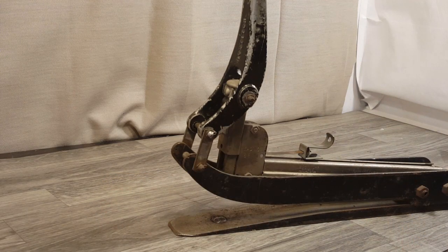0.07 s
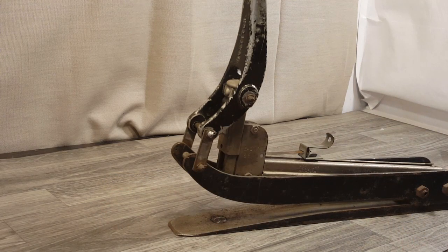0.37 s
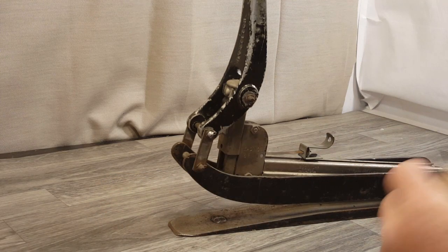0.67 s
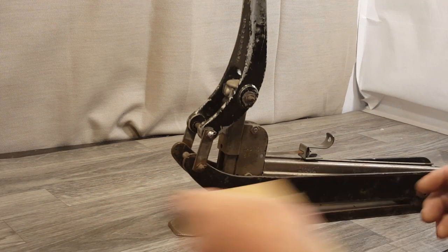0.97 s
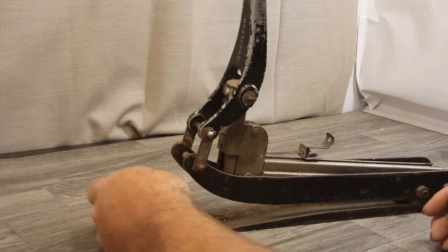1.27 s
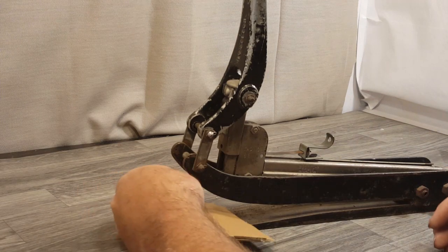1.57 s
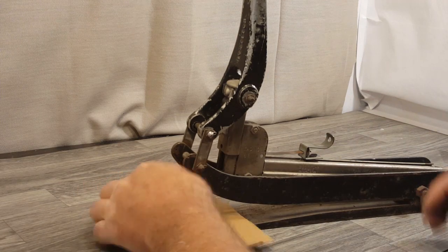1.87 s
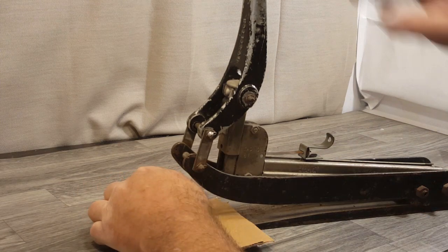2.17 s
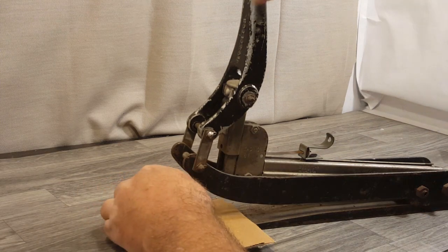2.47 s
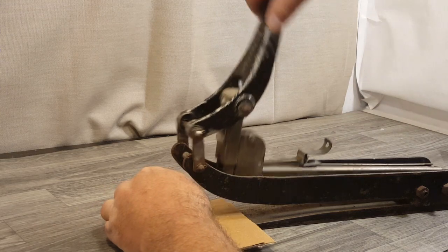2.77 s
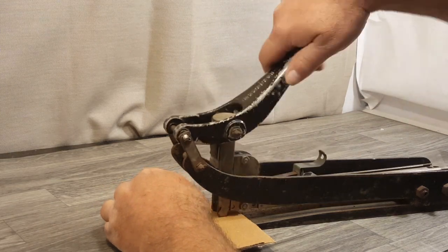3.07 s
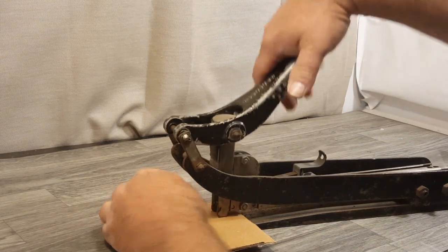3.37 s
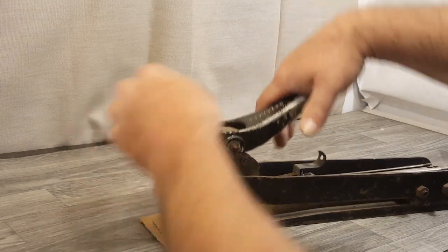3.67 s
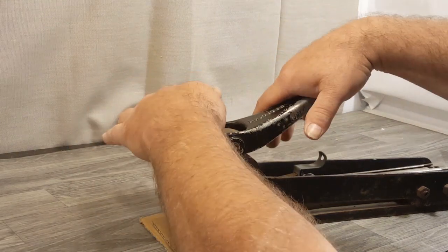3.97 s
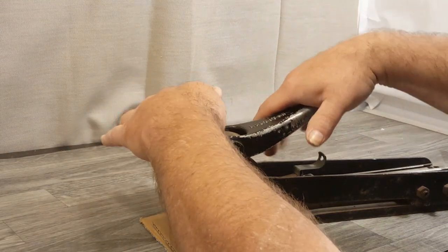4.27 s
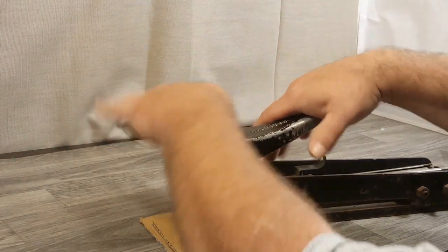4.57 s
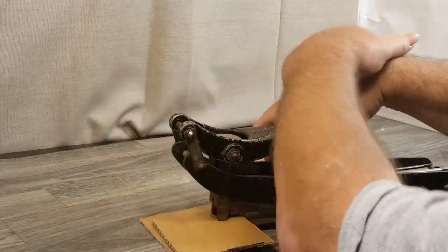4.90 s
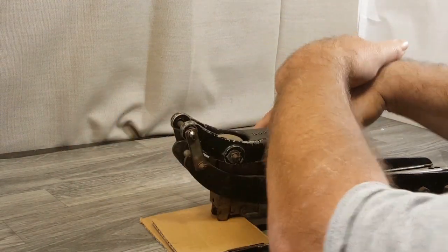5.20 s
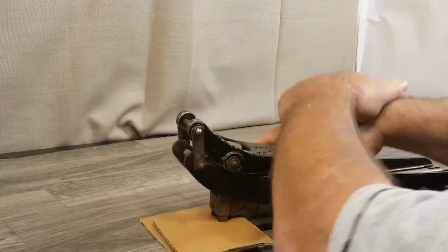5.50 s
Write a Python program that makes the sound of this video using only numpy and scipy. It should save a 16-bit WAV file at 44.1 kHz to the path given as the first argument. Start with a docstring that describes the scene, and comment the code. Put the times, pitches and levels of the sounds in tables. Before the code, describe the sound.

In a small room, a piece of cardboard is pushed along the floor in several soft, scratchy strokes. The metal linkage of a big carton stapler clacks and knocks as its lever comes down. A bright snap and a harder punch follow, then the loudest moment, a double steel clack that shakes the floor. The nearby microphone adds a faint hiss and thin whine.

```python
"""First comes the dry rasp of cardboard, slid over a laminate floor and under a heavy lever carton stapler.
The lever is pulled down: its linkage clicks, the staple snaps off the strip, the driver punches the card,
and a last shove clinches it with a double clack that shakes the floor. Sliding friction makes broadband
noise; each impact excites damped modes of steel, frame and floor, and the small room reverberates.
Beneath it all lie quiet room air and a faint microphone hiss and whine."""
import sys
import numpy as np
from scipy import signal
from scipy.fft import rfft, irfft, next_fast_len
from scipy.io import wavfile
from scipy.ndimage import map_coordinates

SR = 44100
rng = np.random.default_rng(int(sys.argv[2]) if len(sys.argv) > 2 else 0)


def wav_record(signal):
    """Record a signal, one row per channel, as 16-bit PCM in the file named by sys.argv[1]."""
    frames = np.transpose(np.atleast_2d(signal))
    bounded = np.clip(frames, -1, 1)
    # unit amplitude maps onto the largest positive 16-bit level
    quanta = np.round(bounded * 32767).astype(np.int16)
    wavfile.write(sys.argv[1], SR, quanta)


N = 248724
TIME = np.arange(N) / SR
AGE = np.arange(int(SR * .6)) / SR  # time since an impact, t/s

# Events; all levels are relative. Steel contacts of lever, driver and staple: t/s, clack level/dB,
# tick level/dB, knock level/dB, thud level/dB, second strike's delay/s and gain/dB, favoured f/Hz
STEEL_CONTACTS = [(1.959, -29, -46, -45, -66, 0.0057, -6, 1740),
                  (1.9723, -18.5, -50, -38, -35.5, 0.0067, -1.5, 2270),
                  (2.7653, -22.5, -58.5, -38.5, -37.5, 0.0057, -2.5, 1417),
                  (2.8818, -34, -80, -48, -46, 0.0063, -3, 1772),
                  (3.092, -39, -60.5, -55, -55, .005, -2.5, 1754),
                  (3.295, -36, -75, -58.5, -71, 0.0051, -2, 1740),
                  (3.4998, -31, -61, -56, -50.5, 0.0028, -6, 3370),
                  (4.2475, -23.5, -37, -42.5, -50.5, 0.0024, 12.5, 3000),
                  (4.366, -55, -53.5, -82, -85, 0.0017, -4, 6930),
                  (4.4294, -35.5, -46.5, -87, -85, .002, -11, 6930),
                  (4.505, -38, -55, -61, -60, .002, -4, 2315),
                  (4.5303, -27, -48.5, -32.5, -39, .003, -9, 1754),
                  (4.5576, -14, -30, -23.5, -21.5, .0114, -3, 3020),
                  (5.338, -6, -25.5, -15, -8.5, .0025, -2.5, 3500),
                  (5.376, -5, -30.5, -17, -17, 0.0031, 2.5, 1900),
                  (5.440, -25, -47.5, -31, -50, 0.0054, 4, 1400),
                  (5.541, -38, -75, -48, -54, .005, 0, 1417)]
# Dull bumps of hands and stapler base: t/s, thud level/dB, excitation cutoff f/Hz
SOFT_BUMPS = [(1.233, -45.5, 260), (1.397, -43, 300), (2.120, -45.5, 720), (2.834, -39.5, 299),
              (2.896, -40.5, 374), (2.976, -39.5, 435), (3.133, -44, 365), (3.281, -44, 345),
              (3.338, -52.5, 530), (3.444, -46, 310), (3.711, -49, 850), (3.743, -34, 646),
              (3.772, -44, 300), (3.977, -57, 454), (4.277, -44.5, 865), (4.606, -33.5, 675),
              (5.333, -13, 594), (5.346, -15, 570), (5.423, -26, 620), (5.611, -48, 300)]
# Pushes of the card: fastest at t/s, speeding up t/s, slowing down t/s, rasp level/dB, hollow level/dB
CARD_PUSHES = [(.455, 0.041, 0.14, -54.5, -72), (.66, 0.12, 0.041, -51, -51.5),
               (.735, 0.094, 0.028, -54, -63), (.838, 0.025, 0.035, -52.5, -58.5),
               (.94, 0.065, 0.062, -53.5, -59.5), (1.41, 0.024, 0.18, -60.5, -59),
               (1.665, 0.16, 0.11, -55, -61.5), (1.955, 0.24, 0.085, -47.5, -50.5),
               (2.445, 0.053, 0.13, -57.5, -51.5), (3.62, 0.35, 0.21, -84, -64)]
# Card edges catching on the floor: t/s, level/dB
EDGE_SCUFFS = [(0.437, -39), (0.511, -32.5), (0.5224, -41), (0.573, -34.5), (0.672, -35.5), (0.7355, -34.5),
               (0.8315, -34), (0.9268, -34), (1.4002, -43)]

# Modes of lever and driver: f/Hz, level/dB, t60/s
STEEL_MODES = [(1387, 4, 0.037), (1759, 0.5, 0.073), (2056, -15, 0.21), (2277, 3, 0.077), (2420, -21, 0.39),
               (2817, -1, 0.15), (2980, 6.5, 0.025), (3336, 3.5, 0.067), (3880, -11, 0.14),
               (4440, -7, 0.067), (4800, -21, 0.086), (6360, -6, 0.066), (6650, -35, 0.049)]
# Modes of the stapler frame: f/Hz, free level/dB, clamped level/dB, t60/s
FRAME_MODES = [(203, 5, 9.5, 0.2), (236, -0.5, -1.5, 0.23), (266.7, 10.5, 5.5, 0.14), (307, -2, -3, 0.086),
               (365.5, 4.5, -25, 0.081), (377, -12, -6, 0.28), (444, -26, 9.5, 0.064), (514, -9, 1.5, 0.31),
               (657, 4.5, -14, 0.15), (743.7, 0, 3, 0.16), (832, -7.5, -3.5, 0.21), (903, -33, -4.5, 0.26),
               (1004, 0.5, -28, 0.045), (1103, 6.5, -7, 0.062), (1293, -15, -13, 0.25),
               (1400, -27, -21, 0.12), (1634, -5.5, -7, 0.17), (1832, 6, 0, 0.06)]
# Modes of the floor: f/Hz, level/dB, t60/s
FLOOR_MODES = [(84, -15.5, 0.36), (98.9, -0.5, 0.21), (118.7, -11.5, 0.24), (138, -15, 0.15),
               (152, -32, 0.15), (196, -8.5, 0.27)]

# Spectral envelopes of the noises: f/Hz, relative level/dB
CLACK_SPECTRUM = [(300, -1.5), (900, -1.5), (1400, -14.5), (1850, 0.5), (2050, 1), (2350, 4), (2700, -3),
                  (3100, 0.5), (3500, 2.5), (4000, -3.5), (5500, -7.5), (8000, -13), (15000, -86)]  # steel on steel
TICK_SPECTRUM = [(2000, -7.5), (4500, 4.5), (7000, 4), (8500, 1), (10000, -6.5), (12500, -2.5),
                 (15000, -6.5)]  # the bright edge of that impact
KNOCK_SPECTRUM = [(100, -22.5), (190, -3.5), (280, 1.5), (450, -6), (620, -5.5), (800, -6), (1050, -6),
                  (1500, -15), (3000, -28), (9000, -97)]  # a blow to the frame
THUD_SPECTRUM = [(25, -23), (55, -25), (90, 7), (170, -3), (260, -37.5), (600, -60), (1500, -102)]  # a blow to the floor
RASP_SPECTRUM = [(500, -14), (1500, 2.5), (3000, 0.5), (5000, 0), (7000, -1), (10000, -16.5), (12500, -13),
                 (15000, -17)]  # sliding fibres
HOLLOW_SPECTRUM = [(100, -1), (300, -2.5), (450, 3), (650, -3), (950, -0.5), (1400, -10), (2500, -7.5),
                   (6000, -38)]  # the body of the card
SCUFF_SPECTRUM = [(800, -3), (2000, -10), (4300, -7), (5500, 3.5), (7400, -1), (9500, -13.5), (13000, -12),
                  (15000, -18)]  # a catching edge
SQUEAK_SPECTRUM = [(4500, -31), (5900, -17), (6300, 3), (6650, -2), (7000, -3), (7700, -7), (9500, -23)]  # skin on card
AIR_SPECTRUM = [(20, -55), (50, -3.5), (75, -1), (130, -3.5), (300, -10.5), (1000, -19), (2500, -25),
                (7500, -27.5), (10000, -42.5), (12500, -36), (15000, -36)]  # room air
HISS_SPECTRUM = [(700, -25), (1400, -10.5), (1900, -9.5), (2400, -1.5), (2950, -7), (3400, 2), (4100, -3),
                 (5000, -9.5), (7000, -22), (10000, -41), (12300, -17.5), (15000, -40)]  # the left microphone's own noise

# Partials of the electrical whine: f/Hz, level/dB
WHINE_PARTIALS = [(2724, -61), (4086, -70.5)]
# Balance of the microphones: f/Hz, left minus right level/dB
BALANCE = [(100, 1), (400, 0), (1000, 0.5), (1700, 3.5), (3300, 7), (4700, -0.5), (6500, -6.5),
           (8000, -1.5), (9800, 7.5), (13000, 5.5)]
# Gain of the stereo side signal: f/Hz, level/dB
SIDE_GAIN = [(100, -13.5), (280, -9), (500, -5.0), (1200, 1), (3000, 0)]


def steel_clacks():
    """A brief impact has a broad spectrum: steel on steel cracks, ticks and rings, and the room answers."""
    out, hard, bright = np.zeros((2, N)), minimum_phase(CLACK_SPECTRUM), minimum_phase(TICK_SPECTRUM)
    for s, clack_db, _, _, tick_db, spot_hz in linkage_strikes():
        crack = burst(hard, t60=0.022, width=1, rise=.0004)
        steel = amp(-4.5) * ring(struck_steel(spot_hz), scatter_db=3.0, width=1.7)
        room = amp(-8.5) * burst(hard, t60=0.33, width=1.0, rise=0.0035)
        add(out, s, amp(clack_db - 16.5) * (crack + steel + room))
        tick = burst(bright, t60=0.034, width=0.92, rise=0.00049)
        tick_tail = amp(-6.5) * burst(bright, t60=0.12, width=0.93, rise=0.088)
        add(out, s, amp(tick_db) * (tick + tick_tail))
    return out


def struck_steel(spot_hz, favour_db=11, octaves=0.34):
    """Modal excitation: the struck spot favours some modes, and the load detunes each a little."""
    favour = lambda hz: favour_db * np.exp(-(np.log2(hz / spot_hz) / octaves) ** 2)
    return [(hz * np.exp(rng.normal(0, 0.011)), db + favour(hz), t60) for hz, db, t60 in STEEL_MODES]


def linkage_strikes():
    """Backlash: the loose linkage strikes twice at each contact, the second time duller."""
    rows = []
    for s, clack_db, tick_db, knock_db, thud_db, play_s, second_db, spot_hz in STEEL_CONTACTS:
        levels = np.array([clack_db, thud_db - 4, knock_db, tick_db])  # thuds less than the settling
        second_levels = levels + second_db + [0, 0, 0, -2.5]
        rows += [(s, *levels, spot_hz), (s + play_s, *second_levels, spot_hz)]
    return rows


def soft_impacts(even_hz=570, settle_s=.012, settle_hz=342, rock_s=.031, rock_loss_db=11):
    """Damped rebound: hands bump the base, the frame settles after each contact, and both rock back."""
    # harder bumps knock the frame more, by 8.5 dB per octave of cutoff
    handled = [(s, db + 8.5 * np.log2(hz / even_hz), db, hz) for s, db, hz in SOFT_BUMPS]
    settled = [(s + settle_s, knock_db + 1.5, thud_db, settle_hz)
               for s, _, _, knock_db, thud_db, *_ in STEEL_CONTACTS]
    rocked = [(s + rock_s, knock_db - rock_loss_db, thud_db - rock_loss_db, hz * 0.73)
              for s, knock_db, thud_db, hz in handled + settled]
    return [row for row in handled + settled + rocked if row[0] < TIME[-1]]


def frame_knocks():
    """Impulse excitation: hard strikes and dull bumps both set the frame vibrating."""
    out = np.zeros((2, N))
    for s, _, _, db, *_ in linkage_strikes():
        add(out, s, amp(db) * knock(s, cutoff_hz=2100))
    for s, db, _, cutoff_hz in soft_impacts():
        add(out, s, amp(db) * knock(s, cutoff_hz))
    return out


def knock(s, cutoff_hz, clamped_from_s=5):
    """A soft contact is a low-pass filter on the frame's modes; clamping on the card favours other modes."""
    rolloff = lambda hz: -10 * np.log10(1 + (hz / cutoff_hz) ** 6)
    modes = [(hz, (clamped if s > clamped_from_s else free) + rolloff(hz), t60)
             for hz, free, clamped, t60 in FRAME_MODES]
    colour = minimum_phase([(hz, db + rolloff(hz)) for hz, db in KNOCK_SPECTRUM])
    body = amp(-2) * ring(modes, scatter_db=2, width=.6)
    blow = amp(-6) * burst(colour, t60=0.05, width=0.38, rise=0.002)
    room = amp(-4.5) * burst(colour, t60=0.23, width=0.86, rise=0.033)
    return body + blow + room


def floor_thuds():
    """The floor acts as a sounding board under every blow, and reverberation holds the boom."""
    out, colour = np.zeros((2, N)), minimum_phase(THUD_SPECTRUM)
    for s, _, db, *_ in linkage_strikes() + soft_impacts():
        boom = ring(FLOOR_MODES, scatter_db=7.5, width=0.24) * (1 - decay(0.018))
        push = amp(-3.5) * burst(colour, t60=0.058, width=.15, rise=0.0078)
        room = amp(-17.5) * burst(colour, t60=0.42, width=0.13, rise=0.36)
        add(out, s, amp(db) * (boom + push + room))
    return out


def base_judder(start_s=5.328, base_hz=91, floor_hz=128, rise_s=0.015, hold_s=0.086, release_s=.014):
    """Beats: the loaded base rocks against a dying floor mode until the arm settles, then trembles on."""
    age = np.maximum(TIME - start_s, 0)
    rocking = np.sin(2 * np.pi * base_hz * age)
    floor = amp(-2.5) * np.sin(2 * np.pi * floor_hz * age) * decay(1.0, age)
    attack = np.minimum(age / rise_s, 1) ** 2
    held = np.clip(1 - (age - rise_s - hold_s) / release_s, 0, 1)
    tremble = amp(-16) * decay(0.74, age)
    return amp(-18) * attack * np.maximum(held, tremble) * np.sqrt(2) * (rocking + floor)


def sliding_card(grain_db=2, grain_hz=320):
    """Stick-slip friction: fibres catch and let go, louder with speed; an edge scuffs now and then."""
    grains = rng.standard_normal(int(N * grain_hz / SR) + 4)
    grip = unit(amp(grain_db * map_coordinates(grains, [TIME * grain_hz])))
    rasp_gain = sum(amp(db) * hand_speed(*push) ** 1.45 for *push, db, _ in CARD_PUSHES)
    hollow_gain = sum(amp(db) * hand_speed(*push) ** 1.43 for *push, _, db in CARD_PUSHES)
    rasp = amp(1) * rasp_gain * coloured(grip * stereo_noise(0.94, N), RASP_SPECTRUM)
    hollow = amp(-1) * hollow_gain * coloured(grip * stereo_noise(0.63, N), HOLLOW_SPECTRUM)
    out, colour = rasp + hollow, minimum_phase(SCUFF_SPECTRUM)
    for s, db in EDGE_SCUFFS:
        add(out, s, amp(db - 14) * burst(colour, t60=0.13, width=1.0, rise=0.0022))
    return out


def finger_squeak():
    """Friction of dry skin on the card excites a narrow, high band of resonance."""
    speed = hand_speed(fastest_s=1.665, rise_s=.125, fall_s=0.028)
    return amp(-56.5) * speed ** 1.5 * coloured(stereo_noise(0.63, N), SQUEAK_SPECTRUM)


def hand_speed(fastest_s, rise_s, fall_s):
    """Velocity pulse of a push, 0 to 1: the hand speeds up smoothly and comes to rest."""
    since = TIME - fastest_s
    duration = np.where(since < 0, rise_s, fall_s)
    return np.cos(np.pi / 2 * np.clip(since / duration, -1, 1))


def background():
    """The noise floor: room air, plus the left microphone's own hiss and thin electrical whine."""
    air = amp(-58) * coloured(stereo_noise(0.99, N), AIR_SPECTRUM)
    hiss = amp(-55) * coloured(rng.standard_normal(N), HISS_SPECTRUM)
    whine = sum(amp(db) * unit(np.sin(2 * np.pi * hz * TIME)) for hz, db in WHINE_PARTIALS)
    return microphone_pair(air) + np.array([hiss + whine, np.zeros(N)])


def microphone_pair(x):
    """Spatial coherence: long waves reach two closely spaced microphones alike."""
    mid, side = (x[0] + x[1]) / 2, (x[0] - x[1]) / 2
    side = filtered(side, lambda hz: amp(level_at(SIDE_GAIN, hz)))
    return np.array([mid + side, mid - side])


def ring(modes, scatter_db, width):
    """Superposition of damped modes, at new strengths for each blow and each microphone."""
    hz, db, t60 = np.transpose(modes)
    waves = [(-1) ** k * np.sin(2 * np.pi * f * AGE) * decay(t60[k]) for k, f in enumerate(hz)]
    strengths = amp(db + scatter_db * stereo_noise(width, len(hz)))
    return equal_energy(strengths @ np.array(waves))


def burst(colour, t60, width, rise):
    """Source and filter: a dying puff of noise convolved with the impulse response `colour`."""
    puff = stereo_noise(width, len(AGE)) * decay(t60) * (1 - decay(rise))
    return equal_energy(signal.fftconvolve(puff, colour[None], axes=1)[:, :len(AGE)])


def minimum_phase(spectrum, size=4096):
    """Causal impulse response of a spectrum, by folding its cepstrum."""
    gain = amp(level_at(spectrum, np.fft.rfftfreq(size, 1 / SR)))
    cepstrum = irfft(np.log(gain))
    cepstrum[1:size // 2] *= 2
    cepstrum[size // 2 + 1:] = 0
    return irfft(np.exp(rfft(cepstrum)))


def stereo_noise(width, size):
    """Partly correlated white noise: width 0 is mono, 1 is uncorrelated."""
    mid, side = rng.standard_normal((2, size))
    return np.array([mid + width * side, mid - width * side])


def coloured(x, spectrum):
    """Spectral shaping of noise, at rms 1."""
    return unit(filtered(x, lambda hz: amp(level_at(spectrum, hz))))


def filtered(x, gain):
    """Zero-phase filtering by a gain that depends on frequency."""
    size = next_fast_len(N + 8192)
    return irfft(rfft(x, size) * gain(np.fft.rfftfreq(size, 1 / SR)), size)[..., :N]


def level_at(points, hz):
    """Interpolation of (f/Hz, level/dB) points on a logarithmic frequency axis."""
    f, db = np.transpose(points)
    return np.interp(np.log(hz + 1), np.log(f), db)


def decay(t60, age=AGE):
    """Exponential damping, 60 dB in t60 seconds."""
    return np.exp(-np.log(1000) * age / t60)


def amp(db):
    """Decibels to amplitude ratio."""
    return 10 ** (np.asarray(db) / 20)


def unit(x):
    """Normalisation to rms 1."""
    return x / np.sqrt(np.mean(x ** 2) + 1e-20)


def equal_energy(x):
    """Normalisation to the energy of 10 ms at rms 1."""
    return unit(x) * np.sqrt(.01 * SR / x.shape[-1])


def add(track, s, sound):
    """Superposition of a sound on a track at time s."""
    start = round(s * SR)
    track[:, start:start + sound.shape[-1]] += sound[..., :N - start]


def scene():
    """Sound pressures add: stapler and card, coloured differently at each microphone, over faint noise."""
    stapler = floor_thuds() + frame_knocks() + steel_clacks() + base_judder()
    action = microphone_pair(stapler + sliding_card() + finger_squeak())
    balance = lambda hz: amp(np.outer([.5, -.5], level_at(BALANCE, hz)))
    return filtered(action, balance) + background()


def record(dry, ceiling=.95, top_hz=14750):
    """Soft saturation rounds the highest peaks, and a steep low-pass limits the band."""
    soft = dry / (1 + np.abs(dry / ceiling) ** 6) ** (1 / 6)
    return filtered(soft, lambda hz: 1 / (1 + (hz / top_hz) ** 90))


dry = scene()
out = record(dry)
wav_record(out)
```